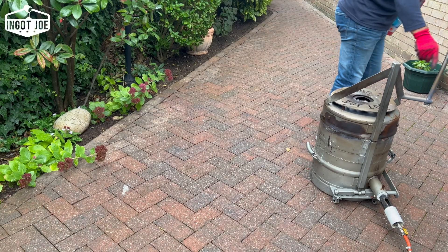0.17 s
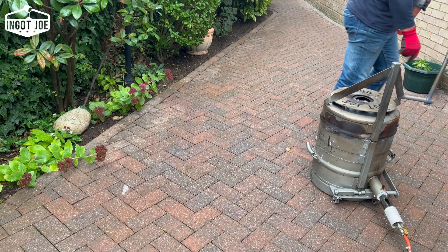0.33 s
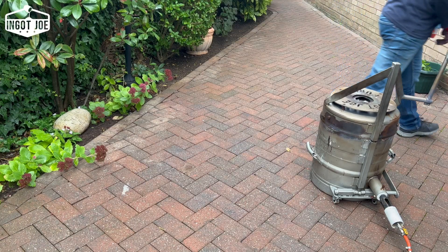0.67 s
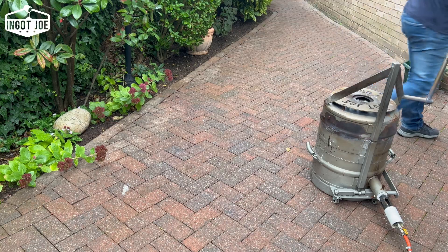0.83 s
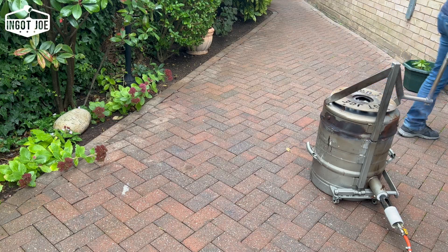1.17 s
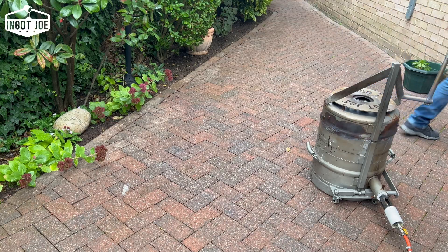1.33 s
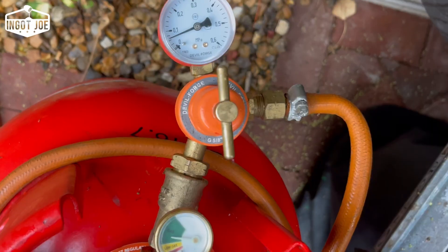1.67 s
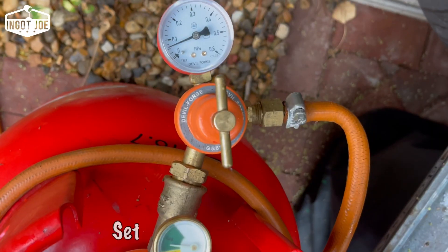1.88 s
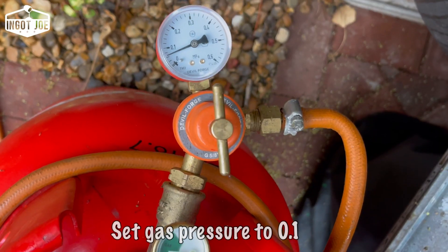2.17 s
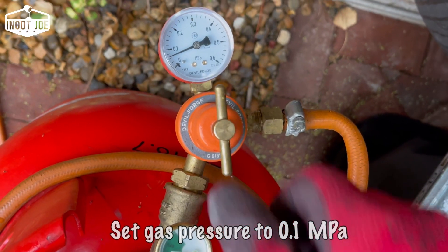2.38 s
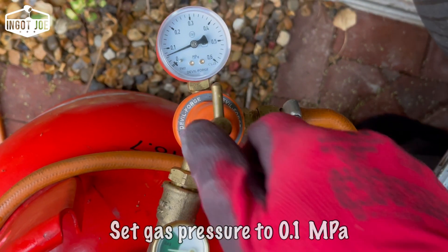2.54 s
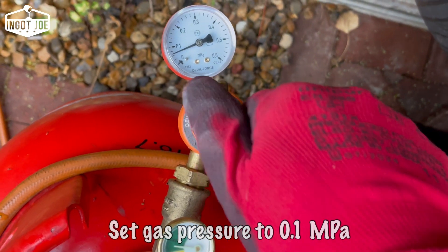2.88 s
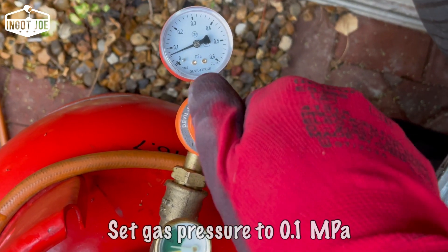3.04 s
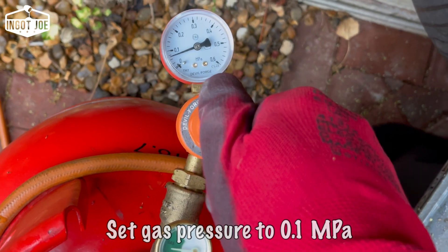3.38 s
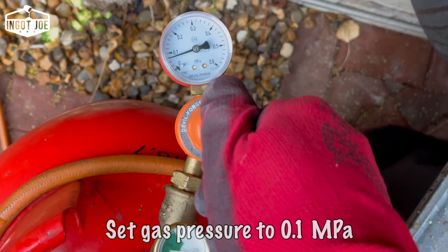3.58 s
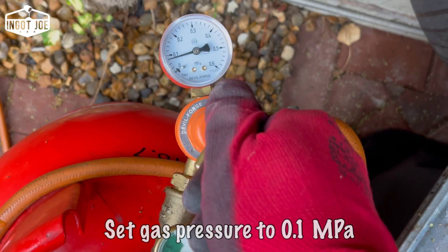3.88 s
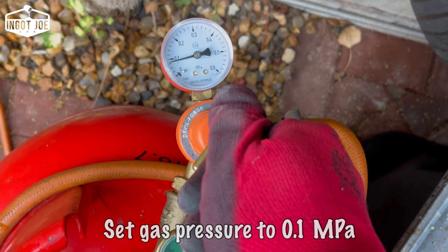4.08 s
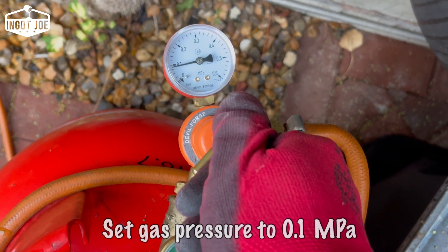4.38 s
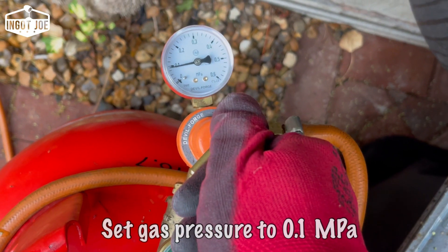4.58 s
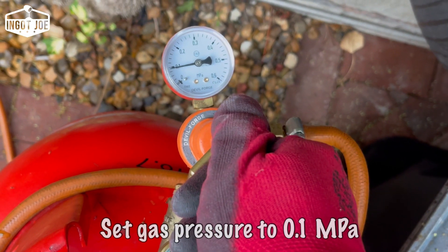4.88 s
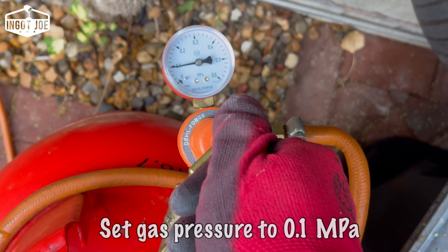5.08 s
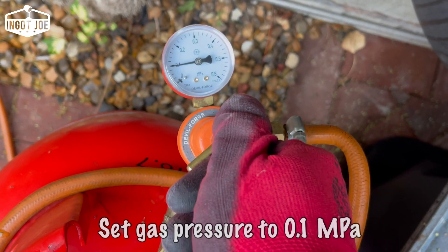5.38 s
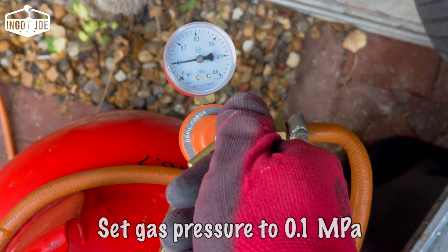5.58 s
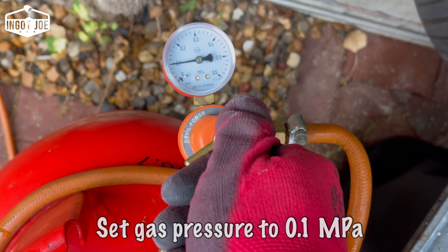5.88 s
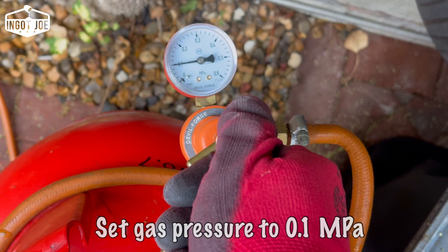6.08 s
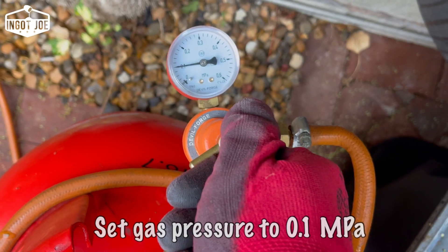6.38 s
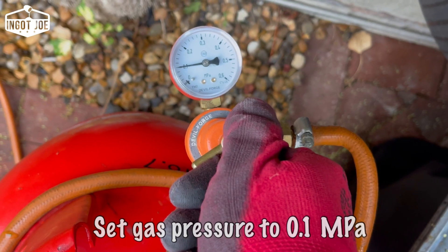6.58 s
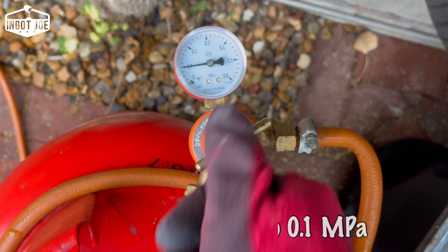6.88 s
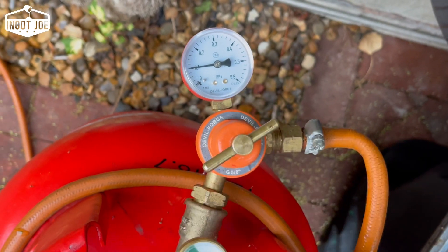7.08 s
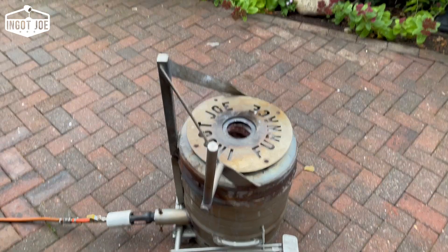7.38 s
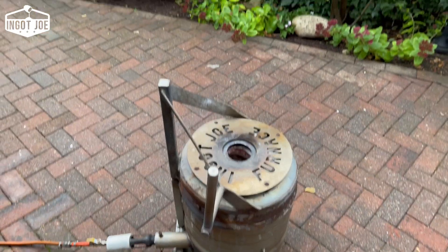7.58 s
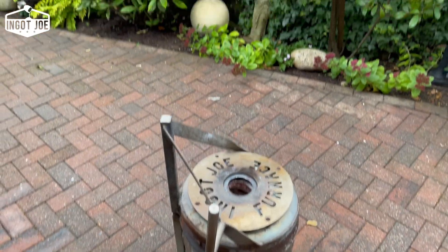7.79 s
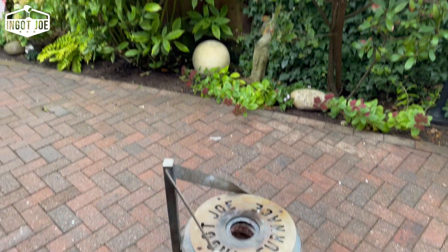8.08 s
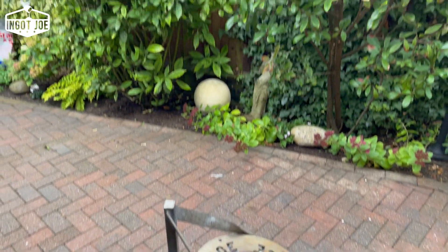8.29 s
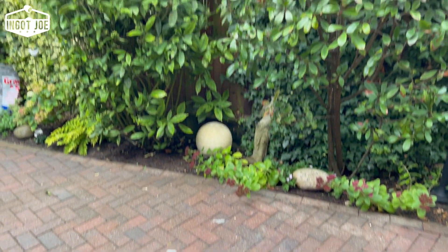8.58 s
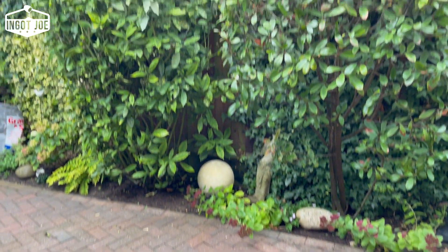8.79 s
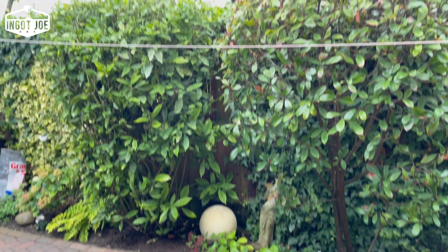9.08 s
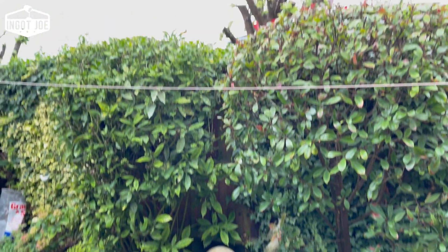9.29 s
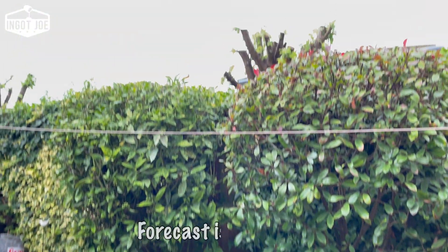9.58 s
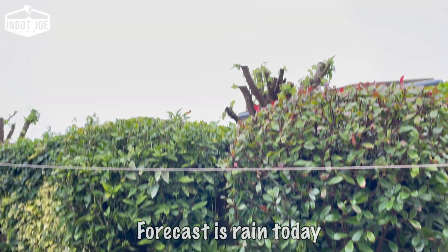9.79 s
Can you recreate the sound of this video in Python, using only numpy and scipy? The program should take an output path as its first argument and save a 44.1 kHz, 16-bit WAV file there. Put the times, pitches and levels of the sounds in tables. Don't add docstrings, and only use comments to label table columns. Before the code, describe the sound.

A gas burner rumbles continuously in a metal drum furnace in a paved yard, deep and throbbing, with fluttering flame and faint hiss. The faint tail of a knock opens it. A pop marks the first cut, then the regulator is opened and the roar grows fuller and louder. A second pop follows, and the strong flame continues. Close stereo microphone, little audible background.

```python
import sys
import numpy as np
from scipy import signal
from scipy.fft import rfft, irfft, next_fast_len
from scipy.io import wavfile
from scipy.ndimage import uniform_filter1d, minimum_filter1d

SR = 44100
rng = np.random.default_rng(int(sys.argv[2]) if len(sys.argv) > 2 else 0)


def master(y):
    cut = np.clip(np.atleast_2d(y).T, -1, 1)
    pcm = np.round(cut * 32767)
    wavfile.write(sys.argv[1], SR, pcm.astype(np.int16))


def convert_level_to_amplitude(level_db):
    exponent = np.asarray(level_db, float) / 20
    return 10 ** exponent


N = 438354

# (frequency [Hz], width [Hz], level [dB])
DRUM_MODES = [(101.2, 28.6, 1.5), (127.9, 24, 1), (151.6, 34, -3.5), (171.4, 3.2, -6)]
# (time [s], level [dB])
FLAME_SURGES = [(.08, -1.5), (.27, -3), (.63, 2.5), (1.51, -11.5), (1.64, -11), (1.72, 2), (2.38, 5.5),
                (2.47, -4), (3.19, 4), (3.56, -6), (3.98, -6), (4.99, 3.5), (5.76, 2), (5.9, 6),
                (6.51, 6.5), (6.92, 6), (7.46, -6.5), (7.72, 2.5), (7.88, 2), (8.1, -2.5), (8.23, -3),
                (8.45, -2.5), (9.05, 1.5), (9.4, 3), (9.67, -5.5), (9.76, -4), (9.83, 4)]


def roar():
    rumble = heard(modes(DRUM_MODES, steep=1.864), patchy_db=0.0, steady_s=0.18)
    return convert_level_to_amplitude(level("roar") + swells(FLAME_SURGES, half_s=0.02)) * rumble


# (frequency [Hz], width [Hz], level [dB])
THROB_MODES = [(62.7, 7.9, 2.5), (51, 7, -1)]
# (time [s], level [dB])
THROB_PUFFS = [(.15, -10), (.38, 5), (.49, -6), (1.51, -9), (2.66, -8), (2.8, 4), (2.9, -9), (3.5, 6),
               (3.65, -11), (4.75, -14), (5.07, 2), (5.19, -4), (5.79, -7), (6.27, 5), (6.7, -7), (7.2, 4),
               (7.48, -6), (7.57, 11), (7.77, -8), (8.43, -4), (8.73, 5), (8.83, -7), (9.02, 2), (9.28, -9),
               (9.57, 2.5), (9.73, -5)]


def throb():
    pulse = heard(modes(THROB_MODES, steep=1.53), patchy_db=-1.5, steady_s=0.26)
    return convert_level_to_amplitude(level("throb") + swells(THROB_PUFFS, half_s=0.052)) * pulse


# (frequency [Hz], width [Hz], level [dB])
LID_MODES = [(223.6, 17.6, 2), (278.7, 21.6, -3.5), (309, 20, -14), (370, 24, -13), (395.7, 17, -13.5),
             (435, 34, -18), (516, 60, -38)]
# (time [s], level [dB])
FLAME_LICKS = [
    (1.6, 2.5),
    (2.48, -1),
    (4.0, 4.5),
    (4.9, 4),
    (5.45, -5),
    (7.0, 0),
    (7.62, -3),
    (7.85, 4.5),
    (8.42, 5),
    (9.1, -0.5),
]


def lid():
    flutter = heard(modes(LID_MODES, steep=1.37), patchy_db=1, steady_s=0.84)
    return convert_level_to_amplitude(level("lid") + swells(FLAME_LICKS, half_s=0.054)) * flutter


# (frequency [Hz], width [Hz], level [dB])
TUBE_MODES = [(641, 63, 0), (711, 23.4, 2), (885, 40, -24.5), (937, 91, -6), (1387, 41, 0),
              (1460, 48, -7.5), (2020, 36, -4.5), (2104, 91, -5), (2344, 350, -12), (2546, 170, -10),
              (2678, 95, -5.5), (3230, 61, -14), (3714, 78, -13.5), (4270, 32, -43)]
# (frequency [Hz], density [dB/Hz])
TUBE_TURBULENCE = [(300, -120), (500, -1.5), (650, -24), (1100, -10), (1250, -29), (1600, -11.5),
                   (1900, -14), (3000, -21.5), (4500, -21.5), (6000, -120)]


def tube():
    tones = modes(TUBE_MODES, steep=1.35)
    colour = lambda f: np.hypot(tones(f), convert_level_to_amplitude(along(TUBE_TURBULENCE, f)))
    return convert_level_to_amplitude(level("tube")) * heard(colour, patchy_db=0.0, steady_s=1.0)


# (frequency [Hz], density [dB/Hz])
JET_COLOUR = [(3000, -120), (4200, -10.5), (5450, -5.5), (5600, -1.5), (6600, -3), (8000, 0.5),
              (9300, -3.5), (9450, 0), (10100, -5), (10500, 6.5), (11200, -2.5), (13300, -6.5), (13600, 1),
              (15200, 0.5)]


def jet():
    hiss = heard(lambda f: convert_level_to_amplitude(along(JET_COLOUR, f)), patchy_db=0.56, steady_s=0.36)
    return convert_level_to_amplitude(level("jet")) * hiss


# (frequency [Hz], width [Hz], level [dB])
CLACK_MODES = [(1000, 450, -2), (1550, 330, 2), (2140, 160, 5), (3920, 250, -5)]


def clack():
    fade_db = -38.5 - 60 * np.arange(N) / SR / 0.3
    return convert_level_to_amplitude(fade_db) * heard(modes(CLACK_MODES, steep=1.1), patchy_db=-1.0, steady_s=0.044)


# (frequency [Hz], level [dB])
YARD_ECHO = [(170, -62), (280, -10), (1000, -6.5), (2500, -8.5), (4000, -3.5), (7500, -8), (9000, -41)]


def yard(x):
    t = np.arange(SR // 10) / SR
    tail = rng.standard_normal((2, len(t))) * convert_level_to_amplitude(-60 * t / 0.12) * (t > 0.002)
    tail = tail / np.linalg.norm(tail, axis=1, keepdims=True)
    tail = tail * convert_level_to_amplitude([[2.1], [-2.1]])
    return filtered(x, lambda hz, m: 1 + convert_level_to_amplitude(along(YARD_ECHO, hz)) * rfft(tail, m))


# (frequency [Hz], density [dB/Hz])
AIR_COLOUR = [(300, -120), (700, -6), (1300, 2), (3000, -6), (4500, -1), (6000, -6), (8000, -120)]


def air():
    noise = rng.standard_normal((2, N))
    return convert_level_to_amplitude(-62.5) * unit(filtered(noise, lambda hz, m: convert_level_to_amplitude(along(AIR_COLOUR, hz))))


# (time [s], left step [amplitude], right step [amplitude])
POP_JUMPS = [
    (1.66190, .37, .33),
    (7.20356, -.45, -.23),
]


def pops():
    t = np.arange(N) / SR
    settle = lambda d: 0.79 * np.exp(-d / 0.0015) + 0.37 * np.exp(-d / 0.008)
    step = lambda s: np.sign(t - s) / 2 * settle(np.abs(t - s))
    jumps = sum(np.outer([left, right], step(s)) for s, left, right in POP_JUMPS)
    return filtered(jumps, lambda hz, m: (hz < 15700) / (1 + (hz / 16000) ** 2))


# (time [s], level over the low flame [dB])
GAS_OPENING = [
    (0, 0),
    (2.9, 0),
    (3.5, 1.5),
    (4.2, 3.5),
    (4.8, 4.5),
    (7.15, 4),
    (7.25, 4.5),
    (8.4, 4),
    (9.94, 5),
]
LOW_FLAME_DB = dict(roar_db=-16, throb_db=-25, lid_db=-33, tube_db=-47, jet_db=-44)
GAS_GROWTH = dict(roar=0.63, throb=0.46, lid=1.35, tube=0.86, jet=1.1)


def level(name):
    s, gas_db = np.transpose(GAS_OPENING)
    return LOW_FLAME_DB[name + "_db"] + GAS_GROWTH[name] * np.interp(np.arange(N) / SR, s, gas_db)


def swells(rows, half_s):
    t = np.arange(0, N, 64) / SR
    bells = sum(db * np.exp(-0.5 * ((t - s) / half_s) ** 2) for s, db in rows)
    return np.interp(np.arange(N) / SR, t, bells)


def modes(table, steep):
    one = lambda f, c, w: (f * w) ** 2 / ((c * c - f * f) ** 2 + (f * w) ** 2)
    return lambda f: np.sqrt(sum(convert_level_to_amplitude(2 * db) * one(f, c, w) ** steep for c, w, db in table))


# (frequency [Hz], lag [rad])
PORT_LAG = [(40, .03), (125, .04), (500, .5), (1150, .9), (1270, 2.6), (1370, 1), (2700, .8), (2980, 0),
            (3300, 1.5), (4100, 1.6), (4450, 3.14), (4850, 2.2), (5700, 2.6), (6400, .2)]
# (frequency [Hz], lag [rad])
TREBLE_LAG = [(7500, 0), (8600, 1.2), (9200, 2.05), (10150, 2.94), (10800, 3.4), (12000, 4.75),
              (13300, 6.08), (14300, 6.65), (15800, 8.5)]
# (frequency [Hz], correlation [0-1])
PORT_LIKENESS = [(165, 0.99), (400, 0.75), (700, 0.69), (1250, 0.53), (2200, 0.78), (2980, 0.49),
                 (3400, 0.69), (4450, 1), (5200, 0.36), (6500, 0.57), (8500, 1), (10000, 0.99),
                 (11800, 0.97), (13300, 0.89)]
# (frequency [Hz], level [dB])
PORT_TILT = [(60, -0.2), (108, -0.8), (122, -0.5), (150, 4.5), (200, -4.5), (300, 0.5), (700, -4),
             (2100, -3.5), (2800, -1.5), (3200, 3), (4400, 2), (5300, 2.5), (5800, -3.5), (8500, -0.5)]


def heard(gain, patchy_db, steady_s):
    z = signal.stft(rng.standard_normal((2, N)), nperseg=512)[2]
    field = uniform_filter1d(rng.standard_normal(z.shape[1:]), size=8, axis=0)
    field = uniform_filter1d(field, size=10, axis=1)
    pair = signal.istft(z * convert_level_to_amplitude(patchy_db * unit(field)), nperseg=512)[1][:, :N]
    m = next_fast_len(N + 8192)
    hz = np.fft.rfftfreq(m, 1 / SR)
    same, other = rfft(pair, m) * gain(hz)
    turn = np.arccos(np.clip(along(PORT_LIKENESS, hz), 0, 1)) / 2
    lag = along(PORT_LAG, hz) + along(TREBLE_LAG, hz)
    port = convert_level_to_amplitude(along(PORT_TILT, hz) / 2) * np.exp(-0.5j * lag)
    left = (np.cos(turn) * same + np.sin(turn) * other) * port
    right = (np.cos(turn) * same - np.sin(turn) * other) / port
    x = irfft([left, right], m)[:, :N]
    slow = uniform_filter1d(np.mean(x ** 2, axis=0), max(round(steady_s * SR), 2))
    slow = uniform_filter1d(slow, max(round(steady_s * SR / 2), 2))
    return x / np.sqrt(np.abs(slow) + 1e-20)


def unit(x):
    return x / np.sqrt(np.mean(x ** 2) + 1e-20)


def along(points, hz):
    f, v = np.transpose(points)
    return np.interp(np.log(hz + 1), np.log(f + 1), v)


def filtered(x, response):
    m = next_fast_len(N + 8192)
    hz = np.fft.rfftfreq(m, 1 / SR)
    return irfft(rfft(x, m) * response(hz, m), m)[..., :N]


def scene():
    furnace = roar() + throb() + lid() + tube() + jet()
    outdoors = yard(furnace + clack()) + air()
    return filtered(outdoors, lambda hz, m: 1 / (1 + (42 / (hz + 1)) ** 4)) + pops()


def band_limit(x):
    return signal.sosfilt(signal.butter(12, 15800, fs=SR, output="sos"), x)


def record(dry):
    need = np.minimum(1, 0.84 / (np.abs(dry).max(axis=0) + 1e-9))
    gain = uniform_filter1d(minimum_filter1d(need, size=1323), size=1323)
    return band_limit(dry * gain)


dry = scene()
out = record(dry)
master(out)
```